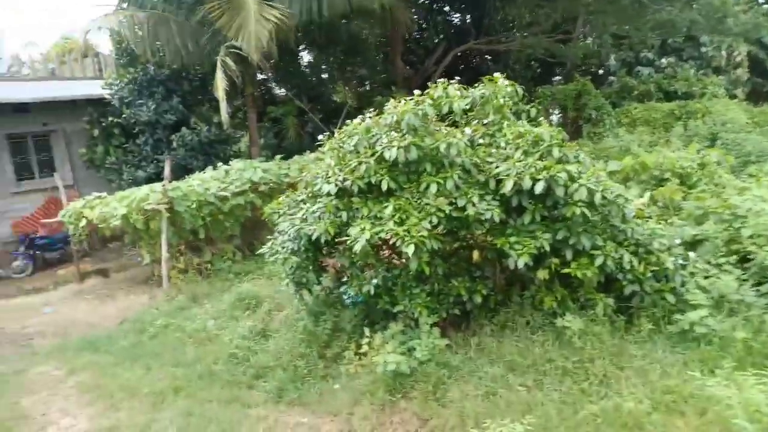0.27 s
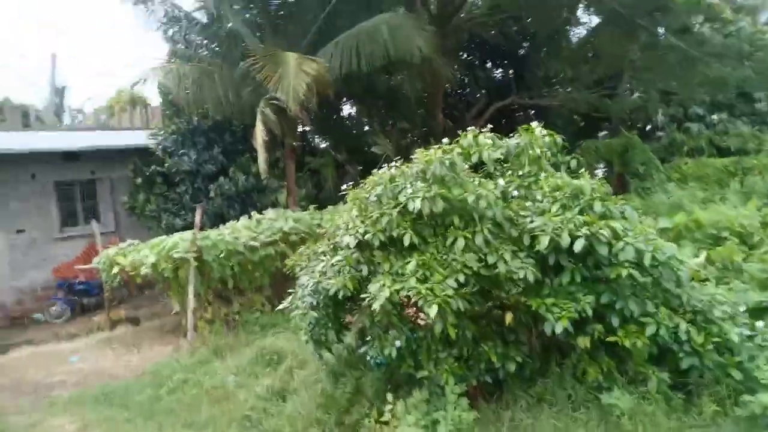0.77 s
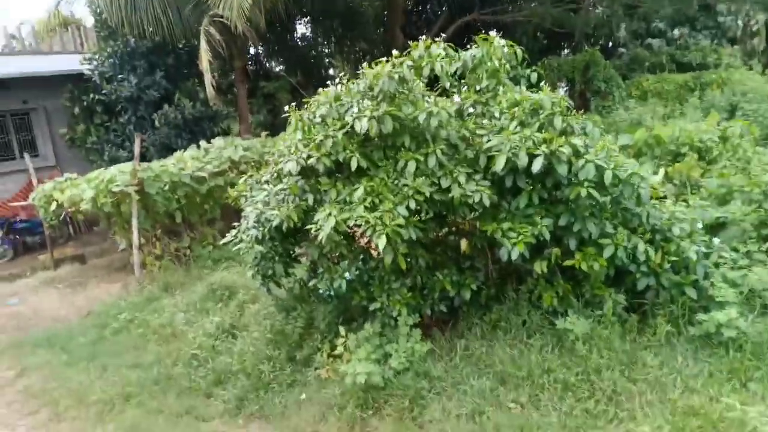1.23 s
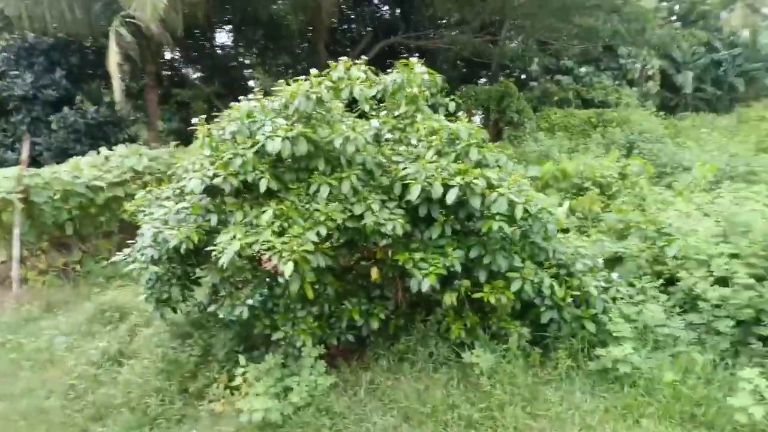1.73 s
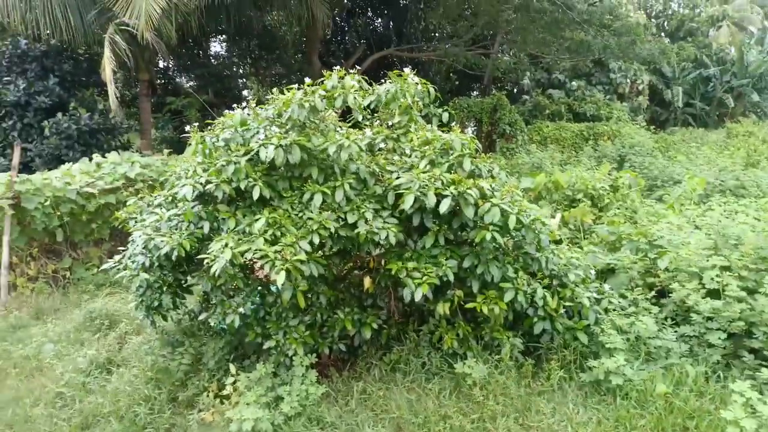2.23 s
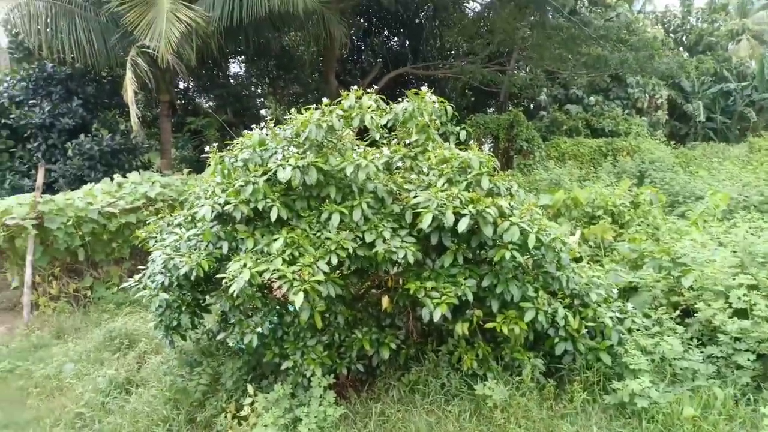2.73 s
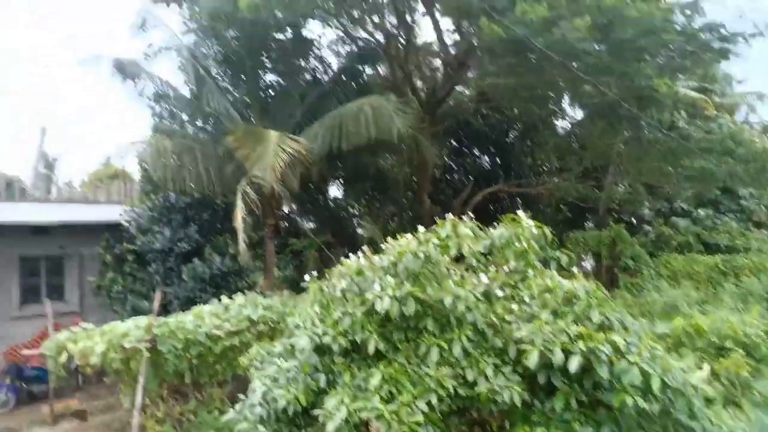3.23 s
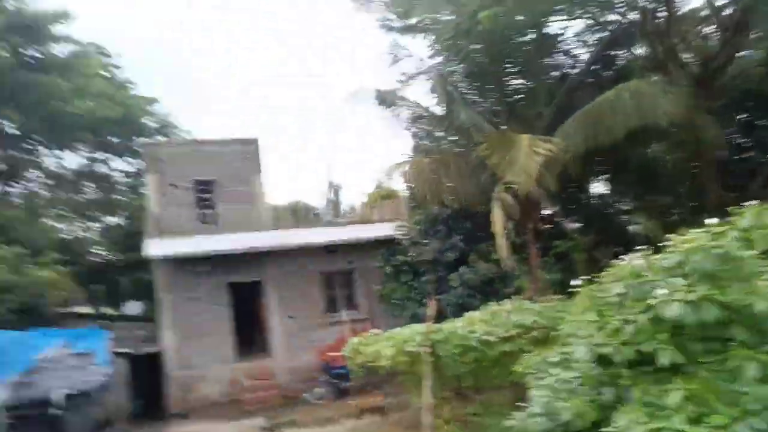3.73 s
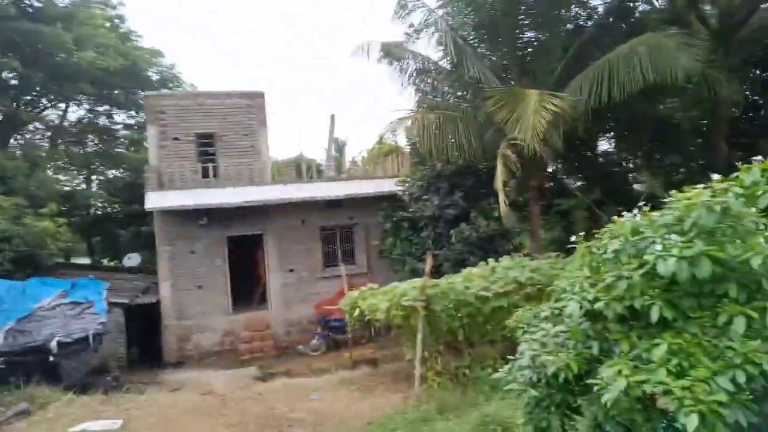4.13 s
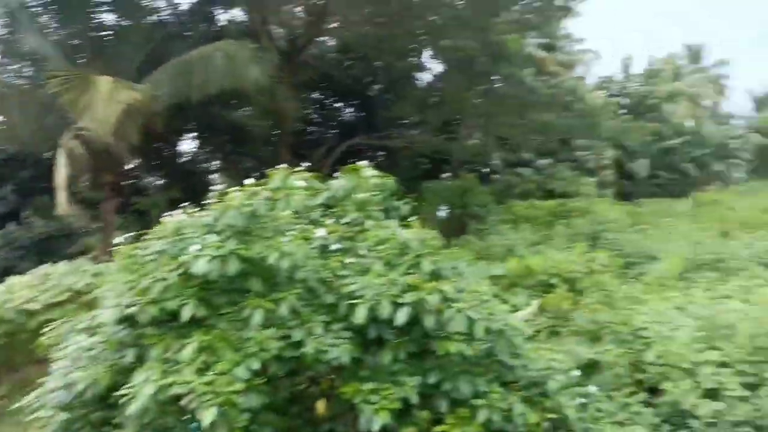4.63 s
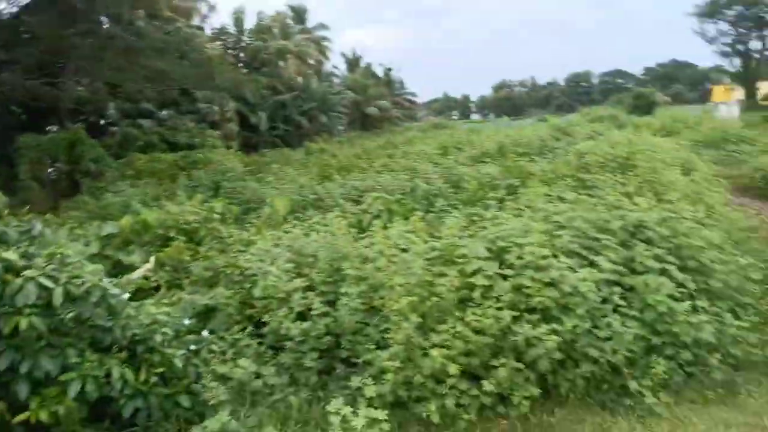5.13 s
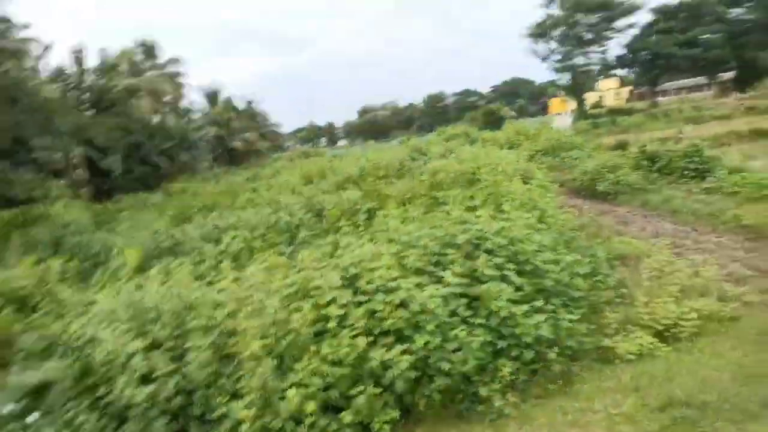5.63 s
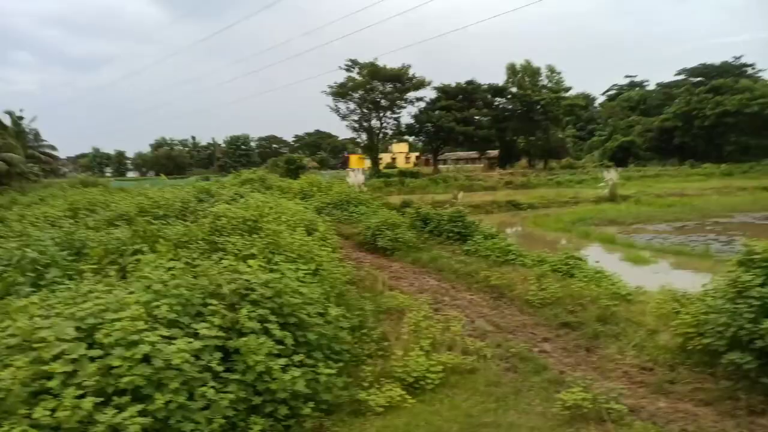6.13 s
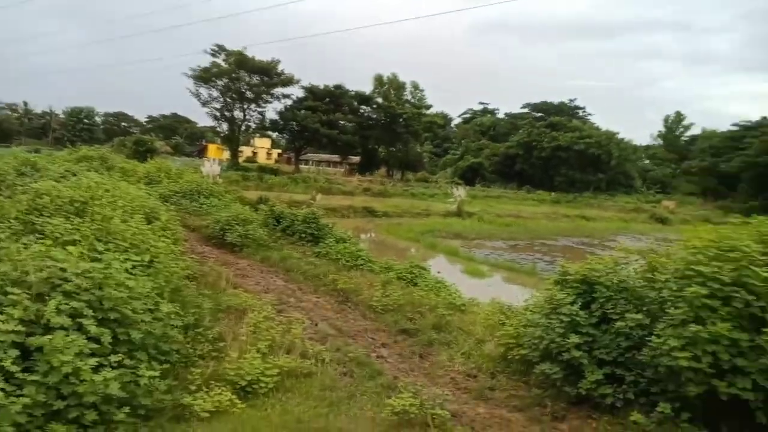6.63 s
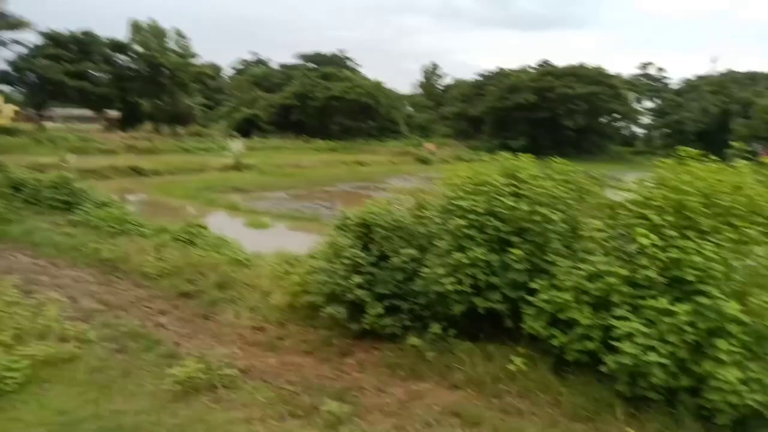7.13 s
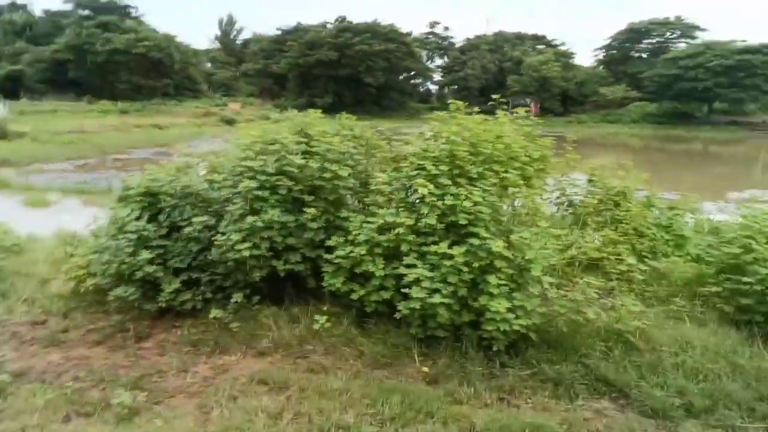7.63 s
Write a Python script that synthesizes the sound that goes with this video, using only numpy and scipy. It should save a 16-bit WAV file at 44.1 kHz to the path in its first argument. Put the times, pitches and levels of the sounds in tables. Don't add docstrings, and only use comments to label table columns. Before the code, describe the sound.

One hoarse rooster crow opens a quiet rural yard, followed by thin insect trills, distant fowl, tiny bird whistles, twig snaps and wind bumps.

```python
import sys
import numpy as np
from scipy import signal
from scipy.fft import rfft, irfft, next_fast_len
from scipy.io import wavfile
from scipy.ndimage import uniform_filter1d

SR = 44100
rng = np.random.default_rng(int(sys.argv[2]) if len(sys.argv) > 2 else 0)


def unload_audio(sound):
    columns = np.transpose(np.atleast_2d(sound))
    steps = np.round(np.clip(columns, -1, 1) * 32767)
    wavfile.write(sys.argv[1], SR, steps.astype(np.int16))


def elevation(decibels):
    levels = np.asarray(decibels, float)
    return 10 ** (levels / 20)


N = 347949


def rms_one(x):
    return x / np.sqrt(np.mean(x ** 2) + 1e-20)


def in_time(rows, count=N):
    s, *columns = np.transpose(rows)
    return [np.interp(np.arange(count) / SR, s, c) for c in columns]


def swells(rows, rest_db, count=N):
    t = np.arange(count) / SR
    out = np.zeros((len(rows[0]) - 3, count)) + np.reshape(rest_db, (-1, 1))
    for s, rise_s, fall_s, *tops_db in rows:
        away = np.maximum((s - t) / max(rise_s, .002), (t - s) / max(fall_s, .002))
        out = np.maximum(out, np.reshape(tops_db, (-1, 1)) - 10 * away)
    return out


def at_hz(points, hz):
    points = np.array(points)
    return np.interp(np.log(hz), np.log(points[:, 0]), points[:, 1])


def panned(db, left_right_db):
    return elevation([db + left_right_db / 2, db - left_right_db / 2])


def drift(rate, count=N):
    r = np.exp(-80 * np.pi * rate / SR)
    steps = rng.standard_normal(count // 40 + 2002)
    slow = signal.lfilter([1], [1, -2 * r, r * r], steps)[2000:]
    return np.interp(np.arange(count) / 40, np.arange(len(slow)), rms_one(slow))


def resonate(x, modes):
    out = 0
    for k, (hz, width_hz, db) in enumerate(modes):
        r = np.exp(-np.pi * width_hz / SR)
        feed = [1 - r * r, 0, r * r - 1]
        ring = [2, -4 * r * np.cos(2 * np.pi * hz / SR), 2 * r * r]
        out = out + (-1) ** k * elevation(db) * signal.lfilter(feed, ring, x)
    return out


PORT_LAG_S = 0.00045


def sine_pair(hz, gains, lag=PORT_LAG_S):
    turn = 2 * np.pi * np.cumsum(hz) / SR + rng.uniform(0, 2 * np.pi)
    return np.sqrt(2) * gains * np.sin([turn, turn - 2 * np.pi * hz * lag])


# pitch_hz, likeness (0-1)
PORT_LIKENESS = [(40, 0.84), (130, 1), (290, 0.88), (640, 0.2), (1400, 0), (15000, 0)]


def coloured(spectrum, patchy_db, rate):
    size = next_fast_len(N)
    hz = np.maximum(np.arange(size // 2 + 1) * SR / size, 1)
    alike = np.clip(at_hz(PORT_LIKENESS, hz), 0, 1)
    mid, side = rfft(rng.standard_normal((2, size))) * elevation(at_hz(spectrum, hz))
    pair = np.sqrt(1 + alike) * mid + np.sqrt(1 - alike) * side * [[1], [-1]]
    out = 0
    for octave in np.arange(4, 15., 2):
        share = np.clip(1 - abs(np.log2(hz) - octave) / 2, 0, 1)
        out = out + irfft(pair * share, size)[:, :N] * elevation(patchy_db * drift(rate))
    return rms_one(out)


# pitch_hz, level_db (per Hz)
AIR_COLOUR = [(30, -24.5), (60, 1.5), (110, -2.5), (200, -4.5), (450, -8.5), (800, -14), (1500, -16.5),
              (2900, -27.5), (5500, -33.5), (6500, -38.5), (8200, -39.5), (12000, -35.5), (15200, -55)]
# start_s, level_db
AIR_LEVEL = [(1.6, -62), (1.76, -71), (1.93, -76), (2.37, -71), (2.86, -79), (3.65, -68), (4.02, -77.5),
             (4.47, -70), (4.72, -73.5), (7.31, -71.5), (7.38, -65.5), (7.89, -74)]


def far_air():
    hush_db, = in_time(AIR_LEVEL)
    level_db = -66.5 + .7 * (hush_db - hush_db.mean())
    return elevation(level_db) * coloured(AIR_COLOUR, patchy_db=2, rate=5.4)


# start_s (of the top), rise_s, fall_s, left level_db, right level_db
GUSTS = [(.37, 0.31, 0.28, -49, -48), (1.39, 3.2, 0.47, -53.5, -53.5), (1.8, 0.85, 0.018, -56, -58),
         (1.878, 0.026, 0.022, -71, -41), (2.147, .04, 0.19, -65, -48), (2.368, 0.31, 0.053, -59, -45),
         (2.9, .2, 0.96, -78, -57), (3.846, 0.75, 0.12, -63, -61.5), (4.384, 0.28, .08, -60, -60.5),
         (5.4, 1.8, .9, -65, -65), (5.744, 0.35, 0.17, -64, -57.5), (6.088, 0.12, 0.76, -56.5, -55),
         (6.71, 0.49, 1.1, -61.5, -60), (7.557, 0.39, 0.11, -48.5, -49)]
# start_s (of the middle), peak level_db, pitch_hz, left-right level_db
KNOCKS = [
    (1.787, -35, 44, 28),
    (1.872, -33, 66, -25),
    (0.35, -46, 70, -5),
]


def wind():
    levels_db = swells(GUSTS, rest_db=-67.5)
    shared, left, right = rng.standard_normal((3, N))
    flow = np.array([left * elevation(5.0 * drift(6.6)), right * elevation(4.9 * drift(30))])
    flow = flow + 1.58 * shared * elevation(4.0 * drift(7.2))
    flow = signal.sosfilt(signal.butter(3, [25, 115], "band", fs=SR, output="sos"), flow)
    out = elevation(levels_db - 1.0) * rms_one(flow)
    t = np.arange(-1500, 1500) / SR
    for s, peak_db, hz, pan_db in KNOCKS:
        knock = np.sin(2 * np.pi * hz * t) * np.exp(-(t / 0.012) ** 2)
        gains = elevation([[peak_db + min(pan_db, 0)], [peak_db - max(pan_db, 0)]])
        out[:, round(s * SR) - 1500:][:, :3000] += gains * knock
    return out


def cricket(trills, hz, pulse_hz):
    place = (in_time(trills)[0] + 0.587) % 1
    swell = np.interp(place, [0, .12, .26, .88, .92, 1], [.02, .02, 0.62, 0.8, .02, .02])
    beat = np.cumsum(pulse_hz * (1 + .012 * drift(3.64))) / SR
    strokes = np.sin(np.pi * beat) ** 2
    wing_hz = hz - 900 * (beat % 1 - .5) + 55 * drift(200)
    wing = np.sin(2 * np.pi * np.cumsum(wing_hz) / SR)
    return rms_one(wing * strokes ** 1.6 * swell * elevation(1.5 * drift(90)))


# start_s, trills so far (count)
LEFT_TRILLS = [(0, .35), (.9, 8.99), (3.9, 36.75), (5.1, 48.82), (6, 57.39), (6.6, 63.31), (7.88, 75.24)]
RIGHT_TRILLS = [(0, -.6), (.75, 6.65), (1.2, 10.59), (5.85, 54.75), (6.9, 65.38), (7.2, 68.54),
                (7.88, 75.1)]
# start_s (of the top), rise_s, fall_s,
# left cricket level_db, right cricket level_db
BOUTS = [
    (1.458, 1.26, 0.26, -51, -69),
    (2.4, 1.2, 0.1, -58, -79),
    (2.665, 0.62, .005, -60, -91),
    (4.385, 0.34, 4.5, -66.5, -79),
    (5.5, 1.1, 1.8, -65.5, -78),
    (6.73, 0.87, 0.23, -71, -64),
    (7.05, .3, 0.22, -70, -74),
    (7.4, .25, .4, -70, -63.5),
    (7.52, 0.42, 0.16, -66, -62),
]
# start_s, level_db
BUZZ = [(0, -67.5), (1.46, -64), (1.87, -76), (2.43, -77), (4.0, -79.5), (5.16, -74.5), (6.73, -71.5),
        (6.92, -76.5), (7.52, -69)]


def insects():
    left_db, right_db = swells(BOUTS, rest_db=[-86, -95])
    buzz_db, = in_time(BUZZ)
    left = elevation(left_db - .8) * cricket(LEFT_TRILLS, 9282, 135)
    right = elevation(right_db - 0.5) * cricket(RIGHT_TRILLS, 9000, 130)
    leak = elevation(-33.0)
    crickets = np.array([left + leak * right, right + leak * left])
    buzz = resonate(resonate(rng.standard_normal(N), [(9570, 840, 0)]), [(10100, 830, 0)])
    return crickets, panned(buzz_db - 9, 20.1) * rms_one(buzz)


# start_s (of the top), rise_s, fall_s, hiss of blades level_db, hollow scuff level_db
STEPS = [(.535, 0.23, 0.24, -73.5, -61), (.742, 0.094, 0.096, -72, -57),
         (1.169, 0.056, 0.064, -62.5, -49.5), (1.45, 0.23, 0.19, -79.5, -63.5),
         (1.725, 0.086, 0.016, -65, -51), (1.9, 0.042, 0.053, -85, -80), (2.306, 0.26, 0.27, -95, -76.5),
         (3.054, 0.094, 0.52, -82, -70.5), (3.488, 0.11, 0.063, -77.5, -63), (3.61, 0.08, 0.19, -91.5, -71),
         (4.391, .11, 0.053, -73.5, -56), (4.602, 0.49, 0.1, -88, -66.5), (5.09, 0.073, 0.86, -78.5, -67),
         (6.432, 0.094, 0.19, -83.5, -67), (6.77, 0.13, 0.054, -70, -52.5), (7.32, 0.12, 0.66, -84, -68),
         (7.58, 0.52, 0.062, -85.5, -71)]
# pitch_hz, level_db (per Hz)
BLADES = [(200, -0.5), (450, -8), (1200, 0.5), (2100, -12), (3000, -13), (4600, -11), (6700, -18),
          (8500, -8), (10800, -18), (12400, -15), (15400, -22.5)]
# pitch_hz, width_hz, level_db
SHOE_HOLLOW = [(1123, 69, 6.5), (1486, 280, -1.5), (497, 170, -12.5), (2150, 430, -8.5)]
# start_s, peak level_db, ring pitch_hz
TWIG_SNAPS = [(6.675, -37, 1300), (6.689, -46, 1150), (6.735, -45, 1350), (6.744, -43, 1250),
              (6.754, -41, 1250), (6.769, -43, 1150), (6.78, -46, 1250), (6.79, -46, 1200),
              (2.415, -64, 2500), (3.27, -67, 9000), (3.72, -69, 11000), (3.81, -64, 1500),
              (4.652, -67, 6500), (4.6, -65, 1400)]


def grass():
    hiss_db, scuff_db = swells(STEPS, rest_db=[-95, -89])
    hiss_db = hiss_db + 13.0 - 0.81 * np.clip(-80.5 - hiss_db, 0, 6)
    hiss = panned(hiss_db, -4.5) * coloured(BLADES, patchy_db=2.0, rate=32)
    scuff_db = scuff_db - .5 * np.clip(-65 - scuff_db, 0, 8)
    grains = rng.standard_normal((2, N)) * elevation(2.7 * drift(49))
    scuff = elevation(scuff_db) * rms_one(resonate(resonate(grains, SHOE_HOLLOW), [(1280, 1230, 0)]))
    t = np.arange(300) / SR
    for s, peak_db, hz in TWIG_SNAPS:
        crack = 0.2 * rng.standard_normal((2, len(t))) * np.exp(-t / 0.001)
        ring = np.sin(2 * np.pi * hz * t) * np.minimum(t / .0012, 1) + crack
        scuff[:, round(s * SR):][:, :len(t)] += elevation(peak_db) * ring * np.exp(-t / 0.0025) * 1.36
    return hiss + scuff


# start_s, length_s, pitch_hz, width_hz, level_db
HOARSE_BANDS = [(0.065, .035, 1330, 99, -51.5), (.12, .035, 1344, 64, -51.5), (.15, .035, 1410, 90, -52.5),
                (1.32, 0.067, 1238, 25, -45), (1.32, 0.0696, 1100, 40, -52), (1.32, 0.083, 1825, 40, -51),
                (1.33, .05, 1410, 40, -55), (1.425, 0.04, 1370, 70, -48), (1.4, .075, 1170, 100, -44.5),
                (1.395, .12, 420, 170, -45.5), (1.45, .1, 623, 80, -53.5), (1.46, .09, 1160, 270, -57.5),
                (1.16, .17, 1490, 40, -51.5), (1.325, .04, 648, 22, -48), (1.44, .11, 300, 90, -50),
                (1.5, .12, 600, 120, -60), (.04, .085, 275, 17, -46), (.125, .055, 283, 20, -48),
                (1, .19, 285, 45, -55.5), (1.27, 0.091, 760, 40, -50.5), (1.08, .16, 1150, 100, -53),
                (1.39, .12, 1040, 320, -56), (2.087, .3, 2040, 260, -75), (1.86, 0.1, 4300, 900, -80),
                (1.87, .06, 2300, 700, -75.5), (2.045, .03, 3950, 200, -82), (7.24, 0.37, 430, 480, -66)]


def hoarse_bands():
    out = np.zeros((2, N))
    for s, length_s, hz, width_hz, db in HOARSE_BANDS:
        at, size = round(s * SR), round(length_s * SR)
        band = resonate(rng.standard_normal((2, size)), [(hz, width_hz, 0)])
        band = resonate(band, [(hz, 2 * width_hz, 0)])
        out[:, at:at + size] += elevation(db) * rms_one(band) * signal.windows.tukey(size, .5)
    return out


def sliding_notes(rows, wobble_hz, pan_db, bend, uneven_db):
    out = np.zeros((2, N))
    wobble, uneven = wobble_hz * drift(60), elevation(uneven_db * drift(76))
    for s, length_s, start_hz, end_hz, db in rows:
        at, size = round(s * SR), round(length_s * SR)
        curve = bend if end_hz < start_hz else 1 / bend
        hz = start_hz * (end_hz / start_hz) ** np.linspace(0, 1, size) ** curve + wobble[at:at + size]
        late_peak = np.linspace(.25, 1.25, size) ** max(curve - 1, 0)
        fade = signal.windows.tukey(size, .6) * late_peak
        out[:, at:at + size] += sine_pair(hz, panned(db, pan_db)[:, None] * fade)
    return out * uneven * elevation(7.0)


# start_s, length_s, start pitch_hz, end pitch_hz, level_db
FOWL = [(0, 0.072, 158, 177, -63.5), (2.27, 0.2, 1010, 960, -75), (2.45, 0.16, 900, 720, -78),
        (2.28, .3, 2340, 2300, -91), (3.2, .6, 1060, 820, -66), (3.7, .14, 870, 660, -70),
        (3.52, .13, 2400, 2270, -85), (3.39, .11, 2540, 2510, -89), (3.22, .23, 2290, 2270, -90),
        (3.6, .2, 1400, 1300, -87), (4.45, 0.54, 863, 862, -83), (4.5, 0.27, 1490, 1487, -79),
        (5.412, 0.028, 930, 900, -65), (5.475, 0.02, 890, 900, -66), (5.535, 0.026, 894, 890, -76),
        (5.485, 0.06, 1380, 1830, -81), (5.535, .05, 1840, 1640, -84), (5.505, 0.062, 1950, 2250, -86),
        (5.59, .085, 2245, 2235, -91), (7.31, 0.071, 895, 892, -61), (7.32, 0.11, 2300, 2260, -85),
        (7.78, 0.035, 1155, 1160, -75), (7.25, 0.1, 186, 187, -61)]


def far_fowl():
    return sliding_notes(FOWL, wobble_hz=7, pan_db=-0.81, bend=2.2, uneven_db=1.5)


# start_s, length_s, start pitch_hz, end pitch_hz, level_db
BIRDS = [(2.535, .06, 4950, 3950, -89), (2.58, .08, 4050, 3400, -83), (2.619, .026, 3950, 4100, -79),
         (2.833, .024, 3500, 6100, -82), (2.845, .02, 4500, 4700, -88), (2.605, .03, 5100, 4200, -92),
         (4.84, .035, 2250, 1900, -86), (2.96, .078, 5750, 5120, -88), (1.93, .04, 5900, 6000, -90),
         (3.425, .071, 5950, 4400, -82), (6.06, .055, 4800, 2900, -75), (6.6, .023, 5000, 5800, -79),
         (2.17, .03, 3320, 3260, -89), (3.07, .045, 3700, 3150, -87), (3.84, .03, 5000, 5250, -96),
         (3.975, .025, 3100, 2900, -91)]
# length_s, start pitch_hz, end pitch_hz
FLICK_UP = (.014, 5100, 6150)
DIVE = (.05, 4800, 2200)
CLOSE = (.05, 2080, 2260)
CHIP = (.018, 3110, 2940)
# start_s, wait_s (before the dive), flick level_db, dive level_db, close level_db
PHRASES = [
    (1.93, 0.11, -90, -102, -99),
    (2.51, .1, -87, -99, -89),
    (4.149, 0.13, -81, -87, -99),
    (4.7, 0.1, -86, -87.5, -86),
    (5.256, 0.107, -71, -81.5, -90),
    (5.605, .11, -71, -79.5, -94),
    (5.96, 0.098, -82, -83, -92),
]
# start_s, level_db
CHIPS = [
    (4.63, -94),
    (5.605, -81),
    (5.985, -82.5),
    (6.195, -87),
    (6.99, -85),
    (7.06, -82.5),
]


def small_birds():
    rows = BIRDS + [(s, *CHIP, db) for s, db in CHIPS]
    for s, wait_s, flick_db, dive_db, close_db in PHRASES:
        rows.append((s, *FLICK_UP, flick_db))
        rows.append((s + wait_s, *DIVE, dive_db))
        rows.append((s + wait_s + .068, *CLOSE, close_db))
    return sliding_notes(rows, wobble_hz=110, pan_db=-8.5, bend=1, uneven_db=2.5)


# start_s (of the top), rise_s, fall_s, rasp level_db, low croak level_db
BREATH_PUSHES = [
    (.12, 0.16, .12, -60, -62),
    (.52, 0.083, .4, -47.5, -70),
    (.75, .5, 0.4, -49, -68),
    (1.15, .2, 0.87, -47.5, -67),
    (1.41, 0.011, 0.18, -54, -46.5),
]
# pitch_hz, width_hz, level_db
THROAT = [(710, 130, 4), (1294, 160, 5.5), (1454, 220, 0), (1810, 120, -0.5), (2270, 390, -7),
          (2620, 890, -9.5)]


def throat_breath(count):
    t = np.arange(count) / SR
    ending_db = 137 * np.clip(t - 1.422, 0, 1)
    rasp_db, croak_db = swells(BREATH_PUSHES, rest_db=-90, count=count) - ending_db
    breath = rng.standard_normal((2, count)) * elevation(2 * drift(80, count))
    rasp = signal.sosfilt(signal.butter(2, [650, 3200], "band", fs=SR, output="sos"), breath)
    rasp = resonate(resonate(rasp, THROAT), [(1310, 1100, 3.0), (2320, 740, -12.5)])
    croak = signal.sosfilt(signal.butter(4, 1300, fs=SR, output="sos"), breath)
    croak = resonate(resonate(croak, [(307, 555, 0.0068), (597, 350, 0.0038)]), [(395, 2100, 0)])
    return elevation(rasp_db - 0.5) * rms_one(rasp) + elevation(croak_db + 8.0) * rms_one(croak)


# start_s, pitch_hz, level_db
SECOND_VOICE = [(.04, 761, -73), (.15, 855, -57), (.42, 869.6, -51.5), (.55, 898, -52), (.85, 853.6, -50.5),
                (1.03, 893, -55.5), (1.13, 922, -46), (1.2, 858, -55), (1.31, 850, -55)]
# main voice (times), second voice (times),
# level_db (over the second voice)
SUM_TONES = [(0, 1, 1), (-1, 2, -3), (1, 1, -7), (0, 2, -4), (2, 1, -13), (1, 2, -16), (3, 1, -22),
             (-1, 3, -13), (4, 0, -24), (2, 2, -30), (5, 0, -35), (4, 1, -35), (2, -1, -22), (0, 3, -26)]


def second_voice(pitch, count):
    t = np.arange(count) / SR
    second, second_db = in_time(SECOND_VOICE, count=count)
    second = second + 8 * drift(35, count) + 40 * np.clip(t - 1.15, 0, .2) * drift(100, count)
    steady_db = uniform_filter1d(second_db, size=6000) + 25 * np.clip(t - 1.15, 0, .12)
    out = np.zeros((2, count))
    for main_times, second_times, mix_db in SUM_TONES:
        sides_db = np.array([3.5 * drift(8, count), 3.5 * drift(11.0, count)])
        fading = elevation(sides_db + 3 * drift(70, count))
        level_db = second_db if main_times == 0 and second_times == 1 else steady_db
        hz = main_times * pitch + second_times * second
        out += fading * sine_pair(hz, elevation(level_db + mix_db))
    return out


# start_s (of the top), rise_s, fall_s, level_db
CHEST = [
    (.11, 0.041, 0.046, -43.5),
    (.3, 0.028, 0.038, -61.5),
    (.452, 0.035, 0.041, -50),
    (.666, 0.18, 0.095, -47.5),
    (1.06, .03, .1, -43.5),
    (1.135, 0.076, 0.06, -37.5),
    (1.3, .2, 0.045, -52.5),
]


def chest_tone(count):
    hz = np.interp(np.arange(count) / SR, [0, .3], [258, 321]) + 3 * drift(21, count)
    level_db, = swells(CHEST, rest_db=-77.5, count=count)
    return sine_pair(hz, panned(level_db - 1.0 + 3.6 * drift(22, count), -1.5))


# start_s, pitch_hz
CROW = [(.03, 544), (.11, 606), (.28, 649), (.52, 650), (.82, 639), (1.15, 602), (1.24, 581), (1.355, 585),
        (1.372, 614)]
# start_s (of the top), rise_s, fall_s, left level_db, right level_db
SURGES = [(.057, .018, .012, -41, -41), (.077, .008, .014, -40, -40), (.103, .008, .03, -37, -39),
          (.14, .1, .1, -36, -37.5), (.2, .07, .07, -29.5, -32), (.285, .17, .025, -40, -35),
          (.36, .1, .03, -36, -41), (.405, .15, .03, -33, -44), (.33, .06, .1, -37, -50),
          (.45, .15, .15, -32, -42), (.5, .12, .11, -33, -39), (.6, .13, .5, -38, -31),
          (.685, .08, .5, -27.5, -30), (.72, .1, .1, -26, -30), (.77, .11, .17, -23, -30.5),
          (.822, .2, .075, -23.5, -32), (.925, .05, .05, -30, -27), (.957, .08, .06, -26, -27),
          (1.012, .08, .06, -31, -30), (1.066, .06, .1, -31, -33), (1.11, .06, .08, -29, -25),
          (1.14, .1, .1, -29, -28), (1.172, .15, .045, -27, -29.5), (1.245, .02, .12, -30, -31),
          (1.29, .1, .025, -30, -33), (1.328, .025, .03, -29, -33), (1.348, .06, .011, -28, -30),
          (1.384, .007, .009, -23, -25), (1.426, .012, .009, -32, -31.5), (1.455, .015, .02, -43, -45)]
# start_s, level_db
BEAK = [(.05, -68), (.35, -42), (.5, -34.5), (.72, -32.5), (.86, -34), (.92, -43), (1.2, -44), (1.34, -62),
        (1.385, -41), (1.5, -66)]
# start_s, main voice lag, octave lag (both in port lags)
WALL_TURN = [(.265, 1, .97), (.3, 2.2, .96), (.38, 1.85, .94), (.53, 1.72, .92), (.63, .78, .9),
             (.75, .8, .62), (.89, 1.45, .7), (.95, 1.05, .8), (1.13, .9, .8), (1.4, 1.05, .8)]


def rooster():
    count = round(1.75 * SR)
    t = np.arange(count) / SR
    pitch = in_time(CROW, count=count)[0] + .8 * drift(23, count)
    sides_db = uniform_filter1d(swells(SURGES, rest_db=-61, count=count), size=250)
    octave_db, = in_time(BEAK, count=count)
    third_db, = swells([(0.47, .04, 9.0, -55)], rest_db=-89.0, count=count) - 250 * np.clip(t - 1.41, 0, 1)
    lag, octave_lag = PORT_LAG_S * np.array(in_time(WALL_TURN, count=count))
    octave_pan_db = np.interp(t, [.7, .83, .9], [0, 9, 1]) + drift(4.2, count)
    main = sine_pair(pitch, elevation(sides_db + 0.6 * drift(32, count)), lag)
    octave_gains = panned(octave_db + 0.58 * drift(35, count), octave_pan_db)
    octave = sine_pair(2 * pitch, octave_gains, octave_lag)
    third_gains = panned(third_db - 1.5 + 3 * drift(26, count), 3 * drift(9.3, count))
    third = sine_pair(3 * pitch, third_gains)
    sounding = np.interp(t, [.03, .04, 1.46, 1.49], [0, 1, 1, 0])
    both = np.interp(t, [.03, .05, 1.31, 1.35], [0, 1, 1, 0])
    call = sounding * (main + octave + third)
    call += both * (chest_tone(count) + second_voice(pitch, count))
    call += throat_breath(count)
    return np.pad(call, ((0, 0), (0, N - count)))


def yard(x):
    t60_s = .3
    t = np.arange(int(t60_s * SR)) / SR
    tail = rng.standard_normal((2, len(t))) * elevation(-60 * t / t60_s) * (t > .012)
    tail /= np.sqrt(np.sum(tail ** 2, axis=1, keepdims=True))
    return signal.fftconvolve(x, tail, axes=1)[:, :N]


def scene():
    crickets, buzz = insects()
    fowl, birds, call = far_fowl(), small_birds(), rooster()
    echoes = yard(elevation(-20) * call + elevation(-15) * birds + elevation(-13) * fowl + elevation(-21) * crickets)
    background = far_air() + wind() + crickets + buzz + grass() + hoarse_bands()
    return background + fowl + birds + call + echoes


def top_cut(x):
    return signal.sosfilt(signal.butter(12, 15400, fs=SR, output="sos"), x)


def record(dry):
    mix = signal.sosfilt(signal.cheby2(10, 50, 15900, fs=SR, output="sos"), dry)
    return top_cut(mix)


dry = scene()
out = record(dry)
unload_audio(out)
```